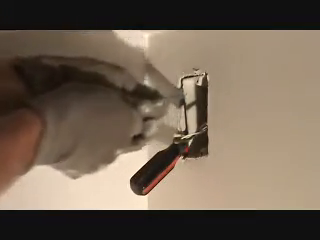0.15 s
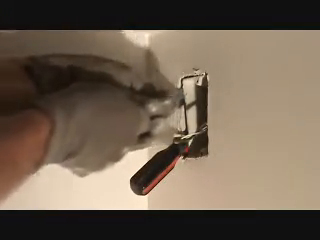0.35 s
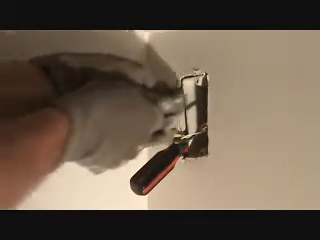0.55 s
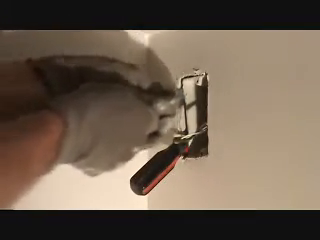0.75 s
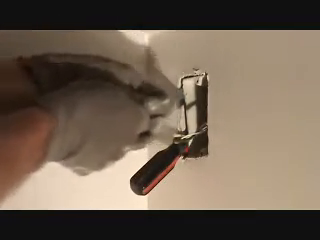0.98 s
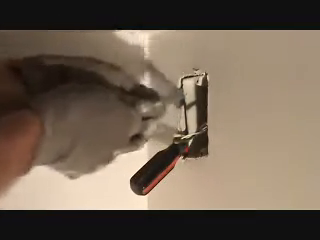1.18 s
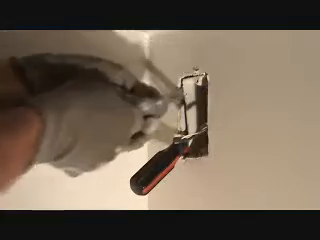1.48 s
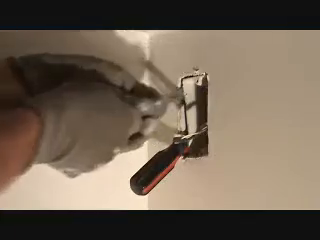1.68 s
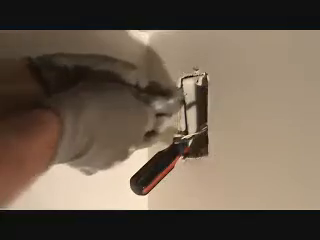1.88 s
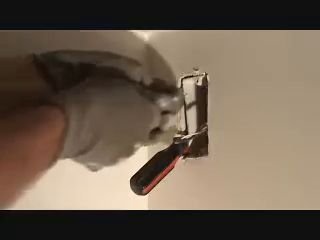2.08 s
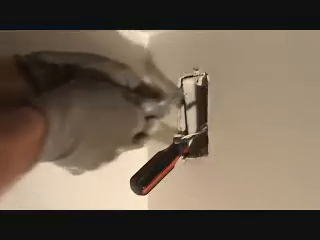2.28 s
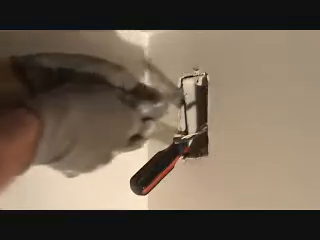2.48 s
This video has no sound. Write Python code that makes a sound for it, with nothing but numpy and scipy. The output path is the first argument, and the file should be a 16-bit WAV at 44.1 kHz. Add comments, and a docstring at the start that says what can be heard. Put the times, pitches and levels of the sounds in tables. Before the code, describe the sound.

A bare hacksaw blade saws a steel nail throughout, already moving at 0 s, about four back-and-forth cycles per second. Gritty cutting strokes buzz the box and drone in the hollow wall; between them come brighter, hissing return rasps with rising rings. Snags chatter; tiny squeaks occur near 0.25, 0.7, 1.3 and 1.55 s, ticks near 0.45 and 1.75 s. The low boom grows until 2.5 s. Close, small room, faint rumble.

```python
"""A bare hacksaw blade saws through a steel nail behind an outlet box, close by in a small room.
On each cutting stroke the teeth bump over the nail at a rate that rises and falls with the hand's speed;
grit bursts ring through blade and nail, and the hollow wall, stud and box drone in their modes.
On the way back the blade skids with a brighter rasp, a thin hiss and a rising ring, and now and then squeaks.
Snags chatter as noise bursts, ticks mark two turns of the blade, and low rumble and faint hiss lie behind."""
import sys
import numpy as np
from scipy import signal
from scipy.fft import rfft, irfft, next_fast_len
from scipy.io import wavfile

SR = 44100
rng = np.random.default_rng(int(sys.argv[2]) if len(sys.argv) > 2 else 0)


def to_wav(s):
    """Save 16-bit WAV."""
    ch = np.atleast_2d(s).T  # columns
    pcm = np.round(np.clip(ch, -1, 1) * 32767)  # PCM
    wavfile.write(sys.argv[1], SR, pcm.astype(np.int16))


N = 116865  # length in samples

# Resonances of blade, nail and box that ring on top of the rasp and chatter.
# Each row: frequency in Hz, width in Hz, lift in dB.
STEEL_MODES = [(860, 41, 11.5), (965, 31, 13), (1050, 20, 14), (1540, 120, 2), (1692, 83, 9.5),
               (2130, 43, -6), (1990, 94, 11), (2188, 57, 6.5), (2349, 81, 8), (2654, 18, 10),
               (3488, 53, 13), (4395, 75, 10.5)]
# Modes of the outlet box. Each row: frequency in Hz, width in Hz, level in dB.
BOX_MODES = [(538.5, 30, -11), (606.4, 21.1, -2.5), (689, 23, -23.5)]


def amp(db):
    """Decibels to gain."""
    return 10 ** (np.asarray(db) / 20)


def unit(x):
    """Scales to rms 1."""
    return x / np.sqrt(np.mean(x ** 2) + 1e-20)


def read(points, hz):
    """Reads a table on a log-frequency axis."""
    f, value = np.transpose(points)
    return np.interp(np.log(hz + 1), np.log(f + 1), value)


def add(mix, s, sound):
    """Mixes a sound in at time s, in seconds; whatever falls outside the scene is cut off."""
    at = round(s * SR)
    sound = sound[max(-at, 0):]
    part = mix[max(at, 0):][:len(sound)]
    part += sound[:len(part)]


def wander(hz):
    """Smooth random movement of rms 1, fading out towards and above hz."""
    f = np.fft.rfftfreq(N, 1 / SR)
    smooth = rfft(rng.standard_normal(N)) * np.exp(-(f / hz) ** 2)
    return unit(irfft(smooth, N))


def colour(x, spectrum, peaks=(), size=8192):
    """Causal filter of unit energy: a broad spectrum with ringing resonances on top."""
    f = np.fft.rfftfreq(size, 1 / SR)
    lift = 1 + sum((amp(db) ** 2 - 1) / (1 + (2 * (f - hz) / width) ** 2) for hz, width, db in peaks)
    log_gain = np.log(amp(read(spectrum, f)) * np.sqrt(np.maximum(lift, 1e-2)))
    # the Hilbert transform of the log gain gives the minimum phase
    both_sides = np.r_[log_gain, log_gain[-2:0:-1]]
    minimum_phase = np.exp(np.conj(signal.hilbert(both_sides)))
    ring = np.fft.ifft(minimum_phase).real[:size // 2]
    return signal.oaconvolve(x, ring / np.linalg.norm(ring))[:N]


def motion(strokes, wall_power, rasp_power):
    """The hand's speed is one arch per stroke; it sets tooth rate, push on wall and box, and rasp strength."""
    rate, on_wall, on_box, rub = np.zeros((4, N))
    for middle, length, top_hz, wall_db, box_db, rasp_db in strokes:
        speed = np.sin(np.pi * np.arange(int(length * SR)) / (length * SR))
        start = middle - length / 2
        add(rate, start, top_hz * speed)
        add(on_wall, start, amp(wall_db) * speed ** wall_power)
        add(on_box, start, amp(box_db) * speed)
        add(rub, start, amp(rasp_db) * speed ** rasp_power)
    return rate, on_wall, on_box, rub


def teeth(rate, jitter, uneven_db, bite, grit_db, smear):
    """Each tooth gives one bump and a dying burst of grit; returns (bumps, grit)."""
    turns = np.cumsum(rate * np.exp(jitter * wander(150))) / SR  # teeth passed so far
    size = amp(uneven_db * np.tanh(wander(400)))
    burst = np.exp(-(turns % 1) / bite) / np.sqrt(bite / 2)
    bumps = sum(np.sin(2 * np.pi * k * turns) / k for k in range(1, 5))
    grains = unit(rng.standard_normal(N) * amp(grit_db * np.tanh(wander(4500))))
    moving = np.minimum(rate / 20, 1)  # silences the grit where the blade stands still
    return size * bumps, unit(size * (burst + smear) * grains * moving)


def cutting(box_db=-11, box_rough=0.69):
    """The teeth bite in step: a gritty rasp, a buzz in the box, and a firm drone that follows in the wall."""
    # Cutting strokes. Each row: middle in seconds, length in seconds, top tooth rate in Hz, wall level in dB,
    # box level in dB, rasp level in dB, lag of the wall's drone in seconds.
    cuts = [(.100, .120, 310, -1, 0, 1, .010), (.368, .120, 295, -1, 0, 1, .022),
            (.622, .125, 325, -1, 2, 2, .016), (.884, .120, 305, -1, -1, 1, .020),
            (1.147, .125, 320, 0, 3, 0, .018), (1.405, .125, 325, 1, 4, -1, .012),
            (1.670, .130, 340, 0, 2, 2, .013), (1.923, .125, 335, 1, -1, -1, .016),
            (2.189, .125, 330, 2, -3, -2, .008), (2.459, .130, 305, 1, -4, -2, .008)]
    # Colour of the cutting rasp. Each row: frequency in Hz, relative level in dB per Hz.
    rasp_colour = [(150, 13), (400, 17.5), (750, -0.5), (1300, 4), (1700, 7), (2400, 6), (3000, -6),
                   (3800, -12), (4800, -5), (7500, -9), (10000, -11.5), (12000, -16)]
    jitter, wall_rough = .05, .35
    wall_level_db, rasp_level_db = -11, -26

    strokes = [row[:-1] for row in cuts]
    rate, _, on_box, rub = motion(strokes, wall_power=1, rasp_power=1.68)
    bumps, grit = teeth(rate, jitter=jitter, uneven_db=4, bite=0.36, grit_db=0.0, smear=1.0)
    box_force = on_box * (bumps + box_rough * wander(870))
    box = amp(box_db) * shake(box_force, BOX_MODES)
    rasp = amp(rasp_level_db) * colour(rub * grit, rasp_colour, STEEL_MODES)

    # the wall's push has its own later strokes, and mostly the first two harmonics of the tooth rate
    late_strokes = [(s + lag, *row) for s, *row, lag in cuts]
    late_rate, on_wall, _, _ = motion(late_strokes, wall_power=0.47, rasp_power=1)
    turns = np.cumsum(late_rate * np.exp(jitter * wander(162.5))) / SR
    sway = np.sin(2 * np.pi * turns) + 0.28 * np.sin(4 * np.pi * turns)
    uneven = amp(5.6 * np.tanh(wander(80)))
    wall_force = on_wall * (sway * uneven + wall_rough * wander(330))
    return box + amp(wall_level_db) * drone(wall_force), rasp


def returning(rough=0.99, box_db=-17):
    """The backs of the teeth skid unevenly: less push, a brighter rasp, a thin hiss and a rising ring."""
    # Return strokes. Each row: middle in seconds, length in seconds, wall level in dB, box level in dB,
    # rasp level in dB, level of the skidding hiss in dB.
    returns = [(-0.015, 0.12, 0, 0, 0, 0), (0.238, 0.13, 0, 0, 1, 0), (0.503, 0.125, -1, -2, 1, 5),
               (0.762, 0.13, 1, 0, 0, 2), (1.02, 0.115, 0, 0, 2, 0), (1.277, 0.13, -2, 4, 0, -1),
               (1.54, 0.125, 0, 1, 1, 1), (1.798, 0.13, 2, 1, 0, 0), (2.056, 0.12, -1, 1, -1, -4),
               (2.326, 0.135, 0, -4, -3, 0), (2.596, 0.11, 1, -1, -1, -4)]
    # Colour of the returning rasp. Each row: frequency in Hz, relative level in dB per Hz.
    rasp_colour = [(150, 9.5), (400, 6.5), (750, -4), (1300, 5), (1700, 6.5), (2200, 7), (3000, 3),
                   (3800, -10), (5500, -4), (7500, -16), (10000, -13.5), (12000, -18.5)]
    # Colour of the skidding hiss. Each row: frequency in Hz, relative level in dB per Hz.
    hiss_colour = [(1000, -55), (3200, -3.5), (4600, 4), (5700, 2.5), (8000, 0.5), (10000, -12.5),
                   (12000, -3)]
    top_tooth_hz = 369.4
    wall_level_db, rasp_level_db, ring_level_db, hiss_level_db = -21.5, -26.5, -28, -40.5
    # the blade's ring at mid stroke; it climbs as the free length changes
    ring_middle_hz, ring_rise_hz_per_s = 2187, 5220

    strokes = [(s, length, top_tooth_hz, *levels) for s, length, *levels, _ in returns]
    rate, on_wall, on_box, rub = motion(strokes, wall_power=0.34, rasp_power=2.41)
    bumps, grit = teeth(rate, jitter=.25, uneven_db=4, bite=0.27, grit_db=4.5, smear=0.17)
    rasp = amp(rasp_level_db) * colour(rub * grit, rasp_colour, STEEL_MODES)

    skid, ring_hz = np.zeros((2, N))
    for middle, length, *_, hiss_db in returns:
        t = np.arange(int(length * SR)) / SR - length / 2
        add(skid, middle + t[0], amp(hiss_db) * abs(np.cos(np.pi * t / length)) ** 0.81)
        add(ring_hz, middle + t[0], ring_middle_hz + ring_rise_hz_per_s * t)
    phase = 2 * np.pi * np.cumsum(ring_hz) / SR
    unsteady_tone = wander(220) * np.cos(phase) + wander(150) * np.sin(phase)
    ring = amp(ring_level_db) * rub * unsteady_tone
    hiss = amp(hiss_level_db) * colour(skid * screech(), hiss_colour)

    force = bumps + rough * wander(640)
    wall = amp(wall_level_db) * drone(on_wall * force)
    box = amp(box_db) * shake(on_box * force, BOX_MODES)
    return wall + box, rasp + ring + hiss


def screech(flare_db=6.0, count=14):
    """Narrow bands of skidding hiss flare up on their own for a few milliseconds each."""
    t, out = np.arange(N) / SR, np.zeros(N)
    for hz in np.linspace(3300, 11000, count):
        flare = amp(flare_db * np.tanh(wander(76)))
        out += wander(500) * np.cos(2 * np.pi * hz * t) * flare
    return unit(out)


def drone(force):
    """The force on the nail rings the wall, and the stud, which booms more as the cut deepens."""
    # Modes of the hollow wall. Each row: frequency in Hz, width in Hz, level in dB.
    wall_modes = [(219, 16, -4.5), (254, 24, -6), (285, 26, -10), (318, 24, -4), (355, 30, -13),
                  (420, 40, -20)]
    # Modes of the stud. Each row: frequency in Hz, width in Hz, level in dB before the steady rise.
    stud_modes = [(122, 14, -16), (150, 14, 3.5), (172, 22, -6)]
    wall_low_hz = 113  # the wall is too stiff to follow slower pushes
    stud_db_per_s, stud_even_s = 2.2, 1.0  # the rise passes 0 dB at stud_even_s

    stiff = signal.butter(3, wall_low_hz, "high", fs=SR, output="sos")
    force = signal.sosfilt(stiff, force)
    stud_rise = amp(stud_db_per_s * (np.arange(N) / SR - stud_even_s))
    return shake(force, wall_modes) + shake(force, stud_modes) * stud_rise


def shake(force, modes):
    """The nail shakes a body, which rings in its modes; a wider mode dies away faster."""
    out = np.zeros(N)
    for hz, width, db in modes:
        r = np.exp(-np.pi * width / SR)
        pole = r * np.exp(2j * np.pi * hz / SR)
        out += 2 * amp(db) * signal.lfilter([1 - r], [1, -pole], force).real
    return out


def bursts(events, decay_s):
    """Sudden puffs of noise that die away."""
    level, t = np.zeros(N), np.arange(SR // 10) / SR
    for s, db in events:
        add(level, s, amp(db) * np.exp(-t / decay_s))
    return level * rng.standard_normal(N)


def snags():
    """The blade snags on the nail and chatters: dying noise bursts ring in the steel."""
    # Each row: start in seconds, level in dB.
    catches = [(.077, -3), (.231, -1), (.497, -2), (.759, 0), (.874, -1), (1.008, 2), (1.527, 1),
               (1.793, 0), (2.046, -1), (2.583, 1)]
    # Colour of the chatter. Each row: frequency in Hz, relative level in dB per Hz.
    chatter_colour = [(300, 8), (1200, -52), (1700, -25), (2100, 7.5), (2600, -10), (3300, 0), (4200, -46),
                      (12000, -81)]
    return amp(-22.5) * colour(bursts(catches, decay_s=.011), chatter_colour, STEEL_MODES)


def squeaks(waver=.06):
    """For a few milliseconds the steel sticks and slips on one high, unsteady pitch."""
    # Each row: middle in seconds, centre pitch in Hz, relative level in dB.
    squeals = [(0.244, 5400, -3), (.515, 7800, -18), (.713, 5700, -2.5), (0.744, 6300, -8),
               (.778, 7800, -24), (1.288, 7160, -5), (1.521, 5400, -3.5), (1.57, 7800, -4)]
    level_db, width_s = -25.5, 0.0026
    t, out = np.arange(N) / SR, np.zeros(N)
    drifting_time = np.cumsum(1 + waver * wander(960)) / SR
    for s, hz, db in squeals:
        swell = np.exp(-((t - s) / width_s) ** 2)
        out += amp(level_db + db) * swell * np.sin(2 * np.pi * hz * drifting_time)
    return out


def ticks():
    """Short clicks of noise as the blade turns round."""
    # Each row: start in seconds, relative level in dB.
    turnings = [(.436, 2), (1.745, -8)]
    return amp(-29) * bursts(turnings, decay_s=0.0018)


def room(x, wet_db):
    """Direct sound plus a short tail of sparse reflections, different in each ear."""
    # Decay of the room. Each row: frequency in Hz, time to fall by 60 dB in seconds.
    decay_times = [(100, 0.28), (300, 1), (1000, 0.2), (2500, 0.67), (6000, 0.47), (12000, 0.6)]
    count = SR // 2
    taps = rng.standard_normal((2, count)) * (rng.random((2, count)) < .1)
    taps[:, :SR // 250] = 0  # no reflection in the first 4 ms
    hz, t, z = signal.stft(taps, SR, nperseg=256)
    fade = amp(-60 * t / read(decay_times, hz)[:, None])
    tail = signal.istft(z * fade, SR)[1]
    tail /= np.linalg.norm(tail, axis=1, keepdims=True)
    apart = .35  # share of the second tail, opposite in the two ears
    tail = tail[0] + np.array([[apart], [-apart]]) * tail[1]
    return x + amp(wet_db) * signal.fftconvolve(x[None], tail, axes=1)[:, :N]


def background(apart=0.13):
    """Low rumble and faint hiss of the room: steady coloured noise, slightly different in each ear."""
    # Colour of the room's noise. Each row: frequency in Hz, relative level in dB per Hz.
    floor_colour = [(20, -33), (40, 17), (58, 13), (75, -42), (110, -65), (300, -6), (1000, 6), (4000, -10),
                    (12000, -22)]
    mid, side = (colour(rng.standard_normal(N), floor_colour) for _ in range(2))
    return amp(-38) * (mid + np.array([[apart], [-apart]]) * side)


def scene():
    """Drone of wall and box, and the steel sounds, in the room."""
    cut_body, cut_rasp = cutting()
    back_body, back_rasp = returning()
    body = cut_body + back_body
    steel = cut_rasp + back_rasp + snags() + squeaks() + ticks()
    return room(body, wet_db=-5) + room(steel, wet_db=-9.5) + background()


def record(dry):
    """Two microphones differ in level and phase, mostly in the bass; peaks are rounded, then the band limited."""
    # Level between the microphones. Each row: frequency in Hz, left over right in dB.
    lean = [(30, -2), (60, -4), (97, -3), (150, -7.5), (250, -8), (330, -7), (430, -1.5), (660, -.3),
            (1500, 0), (12000, 0)]
    # Phase between the microphones. Each row: frequency in Hz, lead of the right in radians.
    lead = [(30, 1.46), (260, 0.92), (520, 0.92), (780, 0.49), (1300, 0.65), (2200, .3), (3500, .22),
            (4500, 0.047), (12000, 0.04)]
    ceiling, edge_hz = .85, 12000

    size = next_fast_len(N + SR // 10)
    f = np.fft.rfftfreq(size, 1 / SR)
    half = np.array([[.5], [-.5]])  # each side takes half the difference
    ports = amp(half * read(lean, f)) * np.exp(-1j * half * read(lead, f))
    heard = irfft(rfft(dry, size) * ports, size)[:, :N]
    heard = heard / (1 + (heard / ceiling) ** 6) ** (1 / 6)
    band = signal.firwin(511, edge_hz, window=("kaiser", 9), fs=SR)
    return signal.oaconvolve(heard, band[None], "same")


dry = scene()
out = record(dry)
to_wav(out)
```